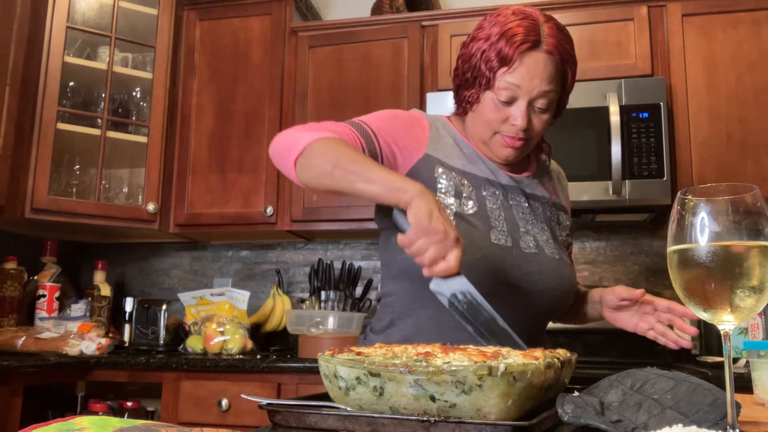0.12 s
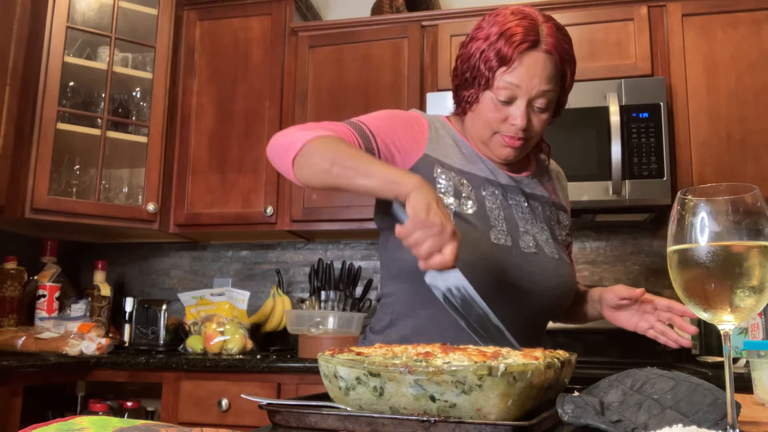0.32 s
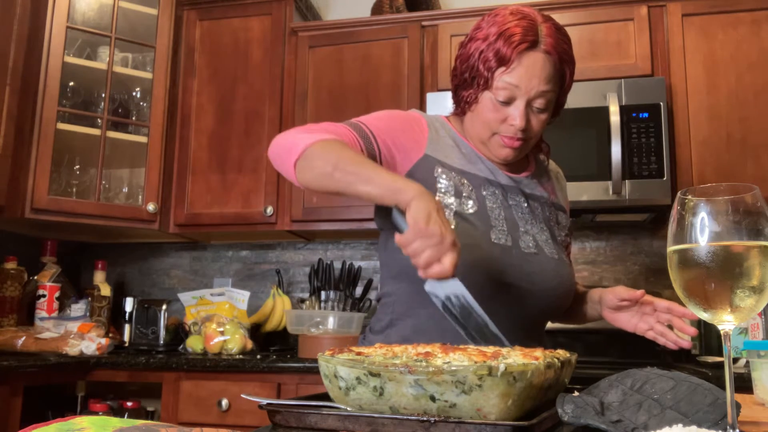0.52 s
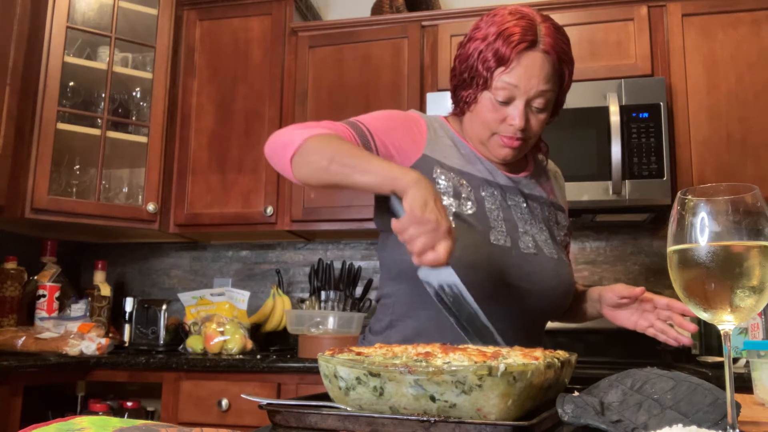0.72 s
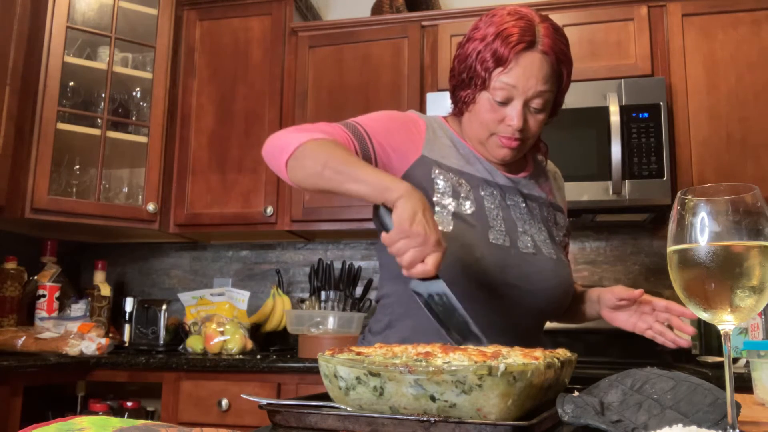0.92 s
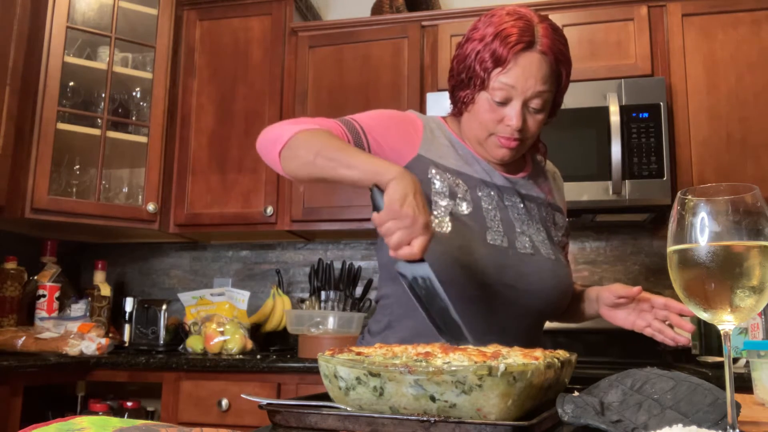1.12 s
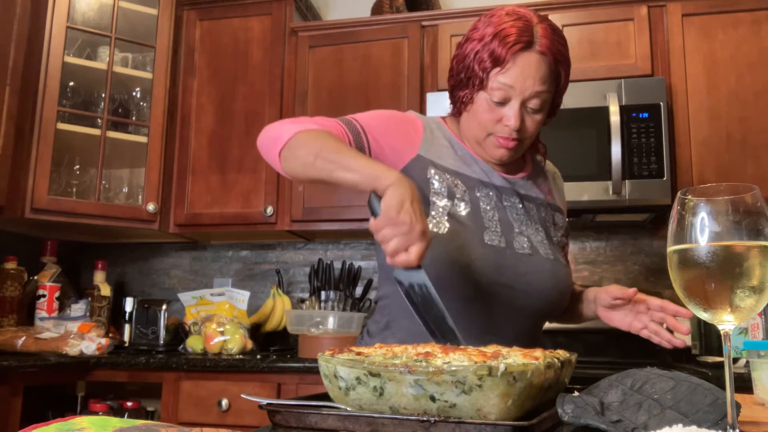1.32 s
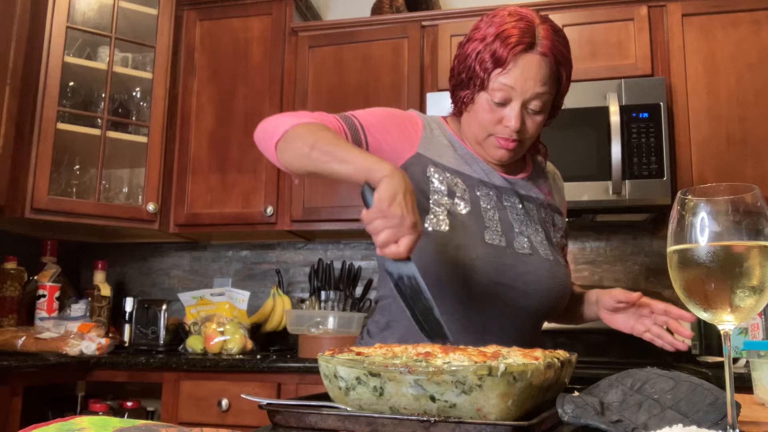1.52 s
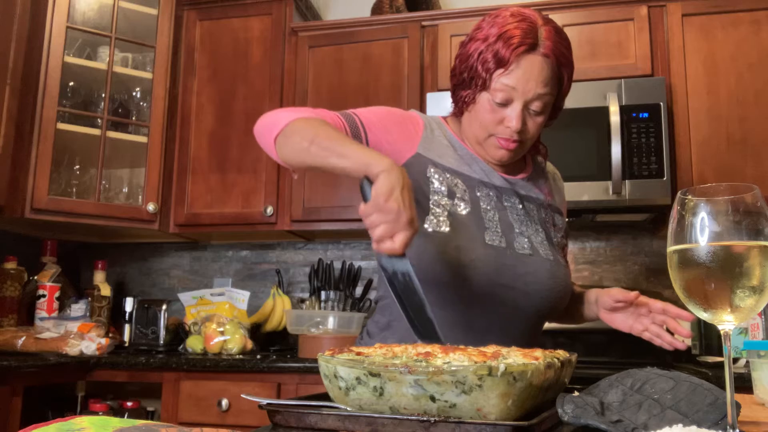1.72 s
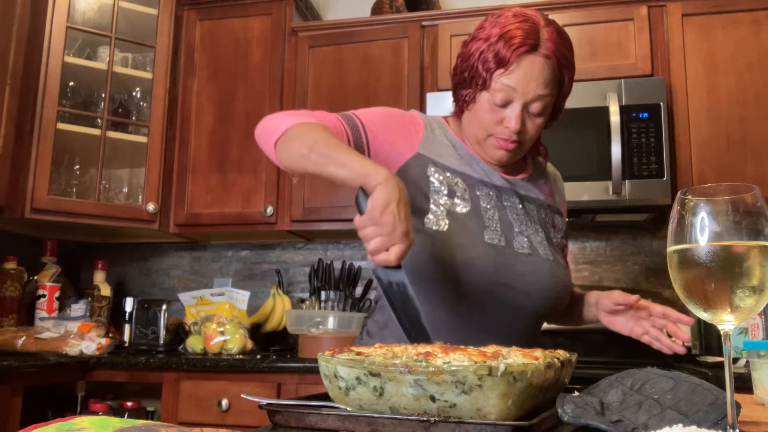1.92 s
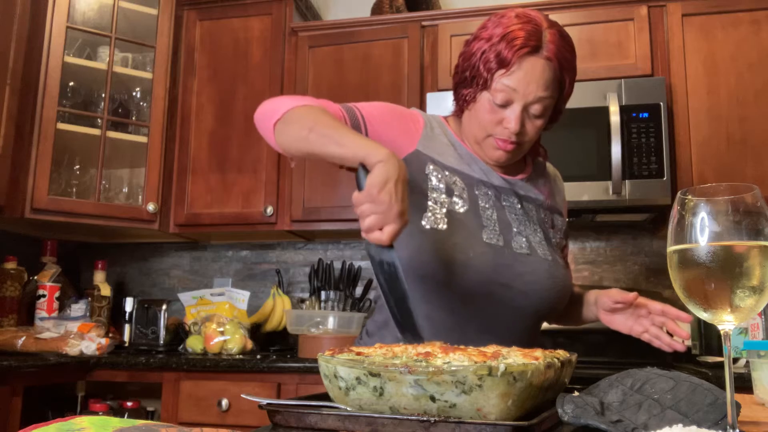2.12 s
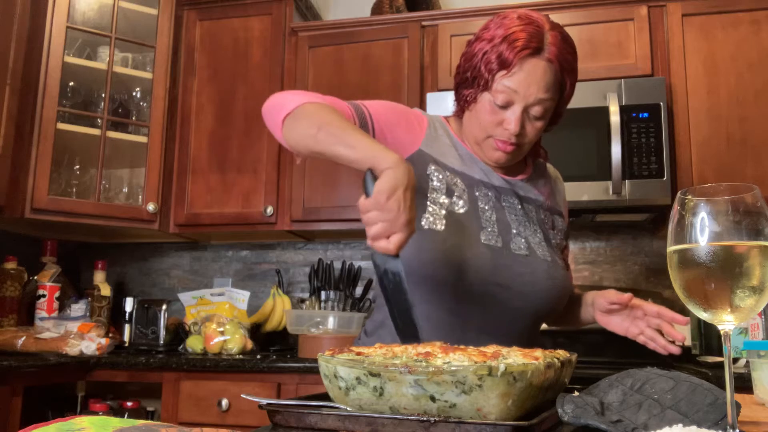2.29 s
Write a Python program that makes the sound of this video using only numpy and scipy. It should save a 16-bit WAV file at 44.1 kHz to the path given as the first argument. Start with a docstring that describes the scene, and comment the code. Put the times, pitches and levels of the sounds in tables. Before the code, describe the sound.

A large knife chops through lasagna and knocks on the bottom of a glass dish six times, the first two loudest. Each dull thud carries a brief clink and a faint wet crackle, heard nearby in a slightly echoing kitchen.

```python
"""A large knife chops through lasagna six times and knocks on the bottom of a glass baking dish.
Each knock is a dull thud that shakes the metal tray and the counter below, a short ring of the glass,
a tick of the blade and a wet crackle of food. Twice the blade hisses faintly through the crust.
Counter and cabinets throw the knocks back, the kitchen rings on, and an appliance hums faintly."""
import sys
import numpy as np
from scipy import signal
from scipy.fft import rfft, irfft
from scipy.io import wavfile

SR = 44100
rng = np.random.default_rng(int(sys.argv[2]) if len(sys.argv) > 2 else 0)


def wav_out(sig):
    """Save sig, one row per channel (or a flat mono array), as 16-bit PCM at SR to the path in sys.argv[1]."""
    wavfile.write(sys.argv[1], SR, np.round(np.clip(np.atleast_2d(sig).T, -1, 1) * 32767).astype(np.int16))


N = 101430
TIME = np.arange(N) / SR   # seconds into the scene
AGE = TIME[:SR]   # seconds since a knock, up to one

# The knife meets the dish: start_s, thud_db, counter_db, glass_low_db, glass_mid_db, glass_high_db,
# tick_db, crackle_db, tick_cutoff_hz, glass_pitch_ratio, thud_hz, thud_rise_s, glass_rise_s
CHOPS = [ (0.203, -9, -34.5, -16, -19, -23, -30, -47, 2820, 0.96, 429, 0.0052, 0.00078),
         (0.6140, -11, -35, -26, -22, -22.5, -31.5, -46, 5560, 0.89, 438.7, 0.005, 0.00048),
         (0.9440, -20, -40, -27, -20.5, -26, -32.5, -46.5, 5860, 1.017, 455, 0.0065, 0.00038),
         (1.3152, -24.5, -43.5, -29, -23, -29, -36.5, -51, 6300, 1.01, 454, 0.006, 0.00068),
         (1.6692, -21.5, -40.5, -25.5, -18.5, -22, -32.5, -46, 6440, 0.992, 445, 0.0067, .0012),
         (1.9800, -19.5, -38.5, -24, -18.5, -19, -30, -41.5, 6730, 0.98, 420, 0.0081, 0.001), ]
# Tones of the food-damped glass (a fade is the time to drop 60 dB): base_pitch_hz, relative_db, fade_s
GLASS_TONES = [(792.7, -1.5, 0.038), (892, -6.5, 0.037), (1027, -9.5, 0.058), (1112, -9, 0.023),
               (1265.4, 3, 0.023), (1459, -8.5, 0.034), (1642, -3.5, 0.031), (1974, -5.5, 0.016)]
# The tray rings on after each thud: pitch_hz, relative_db, fade_s
TRAY_TONES = [(338.3, -22, 0.41), (364, -29.5, 0.51), (517, -20.5, 0.48), (583.6, -19.5, 0.05)]
# The counter gives under the blow: pitch_hz, relative_db, fade_s
COUNTER_TONES = [(120, -7.5, 0.066), (204, -0.5, 0.076), (242, -4, 0.16), (301, 2.5, 0.1),
                 (349, 2.5, 0.085)]
# Tones of the blade, choked by the food: pitch_hz, relative_db
BLADE_TONES = [(2080, -2), (2450, -3), (2720, -4), (3260, -4.5), (3700, -6.5), (4580, -6.5), (5000, -13),
               (5500, -10.5), (6000, -15)]
# Tone colour of pasta and crust parting: frequency_hz, relative_db
CRACKLE_COLOUR = [(300, -32.5), (1500, 9), (3000, -3), (6100, -5.5), (7300, -15), (10000, -21),
                  (15000, -19)]
# The blade slides through the crust: peak_time_s, width_s, level_db, pitch_hz
CRUST_SLIDES = [(.38, 0.077, -82, 7200), (1.283, .03, -74, 6300)]
# First echoes; the cabinets return treble that the dish's wall blocks: delay_s, gain, low_cut_hz
FIRST_ECHOES = [(.0066, 0.27, 4000), (0.0128, 0.67, 2900), (0.0137, .3, 300), (.0225, .15, 100),
                (0.0352, 0.076, 100)]
# Sound scattered around the kitchen: frequency_hz, early_db, late_db, late_fade_s, arrival_s
KITCHEN_SCATTER = [(100, 2, -1.5, 0.36, 0.0027), (453, -10, -12.5, 0.63, 0.0048),
                   (915, 2.5, 1, 0.67, 0.018), (1300, 1, -4, 0.83, 0.0036), (2560, 1.5, 1.5, 0.83, 0.0068),
                   (4770, 9.5, 3, 0.77, 0.0043), (8100, -4, 3.5, 0.57, 0.0054),
                   (15000, -17.5, 2.5, 0.45, .005)]
# Tone colour of the room's steady air noise: frequency_hz, relative_db
AIR_COLOUR = [(25, -32), (60, -19), (100, -6.5), (150, -14), (220, -4.5), (400, -8.5), (700, -18),
              (1200, -23.5), (2300, -29), (4000, -37.5), (6200, -38), (7500, -52.5), (10500, -56.5),
              (15000, -43.5)]

GLASS_RANGES_HZ = (850, 1250, 1650)   # low, middle, high
SHAKE_RISE_S = 0.0043   # tray and counter take a moment to move


def knocks():
    """Each chop lands on a new spot and reaches the room differently; food cushions the contact."""
    out = np.zeros(N + SR)
    counter = ring(COUNTER_TONES) * rise(SHAKE_RISE_S)
    for (start_s, thud_db, counter_db, low_db, mid_db, high_db, tick_db, crackle_db,
         tick_cutoff_hz, pitch_ratio, thud_hz, thud_rise_s, glass_rise_s) in CHOPS:
        knock = from_db(thud_db) * thud(thud_hz, thud_rise_s)
        knock += glass((low_db, mid_db, high_db), pitch_ratio) * rise(glass_rise_s)
        knock += from_db(tick_db) * tick(tick_cutoff_hz)
        knock += from_db(crackle_db) * crackle()
        knock += from_db(counter_db) * counter
        start = int(start_s * SR)
        out[start:start + SR] += signal.fftconvolve(knock, kitchen())[:SR]
    return out[:N]


def thud(pitch_hz, rise_s):
    """The full dish bounces a few times and shakes the tray."""
    progress = AGE / rise_s
    swell = (progress * np.exp(1 - progress)) ** 4.72   # a higher power makes it shorter
    tray = ring(TRAY_TONES) * rise(SHAKE_RISE_S)
    return swell * np.sin(2 * np.pi * pitch_hz * AGE) + tray


def glass(range_db, pitch_ratio):
    """The spot that is struck decides how strongly the low, middle and high tones ring."""
    tones = [(hz, db + np.interp(hz, GLASS_RANGES_HZ, range_db), fade_s)
             for hz, db, fade_s in GLASS_TONES]
    return ring(tones, pitch_ratio)


def tick(cutoff_hz, fade_s=0.012):
    """Steel on glass: a click and the blade's brief ring, dulled by the food in between."""
    blade = ring([(hz, db, fade_s) for hz, db in BLADE_TONES])
    contact = from_db(-8) * click(low_cut_hz=1400)
    muffle = signal.butter(8, cutoff_hz, fs=SR, output="sos")
    return signal.sosfilt(muffle, blade + contact + 1e-18)


def crackle(fade_s=0.12, size_spread_db=9):
    """Pasta and crust part under the edge in a short, dying spray of tiny wet clicks."""
    grains = rng.standard_normal(SR) * from_db(size_spread_db * rng.standard_normal(SR))
    colour = from_db(at_hz(CRACKLE_COLOUR, np.fft.rfftfreq(SR, 1 / SR)))
    spray = unit_level(irfft(rfft(grains) * colour, SR))
    return spray * from_db(-60 * AGE / fade_s) * rise(seconds=0.001)


def slides(width_hz=500):
    """A faint, narrow hiss swells and fades as the blade moves through the crust."""
    out = np.zeros(N)
    for peak_s, width_s, level_db, pitch_hz in CRUST_SLIDES:
        swell = np.exp(-.5 * ((TIME - peak_s) / width_s) ** 2)
        hiss = noise(lambda hz: np.exp(-.5 * ((hz - pitch_hz) / width_hz) ** 2))
        out += from_db(level_db) * swell * hiss
    return out


def kitchen(early_fade_s=0.18, build_s=0.001):
    """The room's answer to a click: a few echoes, a quick scatter off the cabinets and a long tail."""
    band_edges = np.r_[0, np.geomspace(200, 12800, 13), SR]
    white, freq = rfft(rng.standard_normal(SR)), np.fft.rfftfreq(SR, 1 / SR)
    out = np.zeros(SR)
    for low, high in zip(band_edges, band_edges[1:]):
        hz = np.clip(np.sqrt(low * high), 100, 15000)
        early_db, late_db, late_fade_s, arrival_s = (at_hz(KITCHEN_SCATTER, hz, k) for k in (1, 2, 3, 4))
        power = 0
        for db, fade_s in ((early_db, early_fade_s), (late_db, late_fade_s)):
            rate = 2 * np.log(1000) / fade_s
            power += from_db(db) ** 2 * rate / SR * np.exp(-rate * AGE)
        build = 1 - np.exp(-np.maximum(AGE - arrival_s, 0) / build_s)
        band = irfft(white * (freq >= low) * (freq < high), SR)
        out += band * np.sqrt(power) * build
    out[0] += 1   # the direct sound
    for delay_s, gain, low_cut_hz in FIRST_ECHOES:
        out += gain * click(low_cut_hz, delay_s)
    return out


def background(air_db=-57.5, hum_db=-70, hum_hz=99.8, hum_width_hz=3):
    """Steady air noise and the wavering hum of an appliance."""
    air = noise(lambda hz: from_db(at_hz(AIR_COLOUR, hz)))
    hum = noise(lambda hz: 1 / (1 + ((hz - hum_hz) / hum_width_hz) ** 2))
    return from_db(air_db) * air + from_db(hum_db) * hum


def ring(tones, pitch_ratio=1):
    """A struck object rings as fading sine waves, every second one flipped upside down."""
    return sum((-1) ** k * from_db(db - 60 * AGE / fade_s) * np.sin(2 * np.pi * hz * pitch_ratio * AGE)
               for k, (hz, db, fade_s) in enumerate(tones))


def rise(seconds):
    """A soft start, climbing from 0 towards 1."""
    return 1 - np.exp(-AGE / seconds)


def click(low_cut_hz, delay_s=0):
    """A single click without its bass."""
    pulse = (np.arange(SR) == int(delay_s * SR)) + 1e-18
    return signal.sosfilt(signal.butter(1, low_cut_hz, "high", fs=SR, output="sos"), pulse)


def noise(gain_at_hz):
    """Noise with a chosen tone colour and an average level of 1."""
    colour = gain_at_hz(np.fft.rfftfreq(N, 1 / SR))
    return unit_level(irfft(rfft(rng.standard_normal(N)) * colour, N))


def at_hz(rows, hz, column=1):
    """Read a table at any frequency, gliding between its rows on a musical (log) scale."""
    table = np.array(rows)
    return np.interp(np.log(np.maximum(hz, 1)), np.log(table[:, 0]), table[:, column])


def unit_level(sound):
    """Scale a sound to an average (rms) level of 1."""
    return sound / np.sqrt(np.mean(sound ** 2) + 1e-20)


def from_db(db):
    """Turn decibels into a number to multiply by."""
    return 10 ** (np.asarray(db) / 20)


def scene():
    """Knocks and blade hiss over the quiet background, in one channel."""
    return (knocks() + slides() + background())[None]


def record(dry, low_cut_hz=45, high_cut_hz=16250):
    """The microphone loses the deep bass; the highest treble is cut steeply."""
    thin = signal.sosfilt(signal.butter(2, low_cut_hz, "high", fs=SR, output="sos"), dry)
    return signal.fftconvolve(thin, signal.firwin(301, high_cut_hz, fs=SR)[None], "same")


dry = scene()
out = record(dry)
wav_out(out)
```